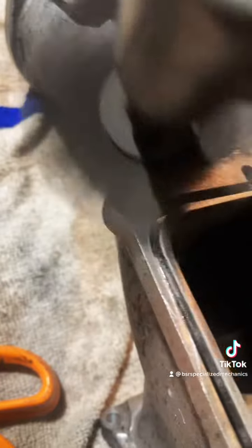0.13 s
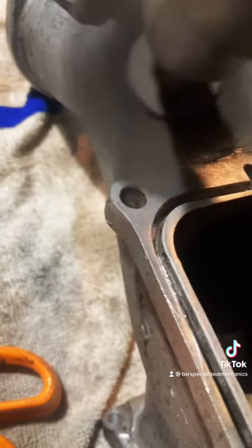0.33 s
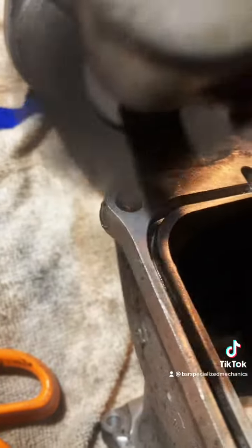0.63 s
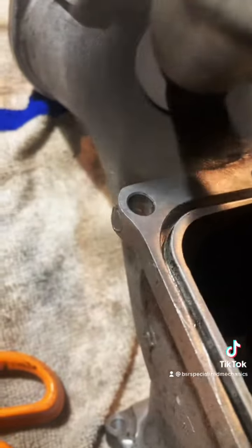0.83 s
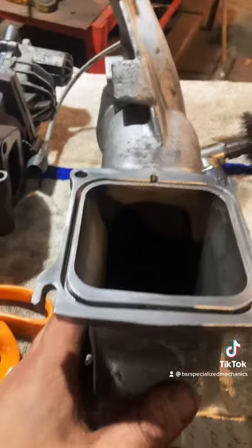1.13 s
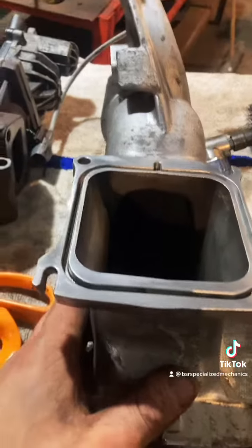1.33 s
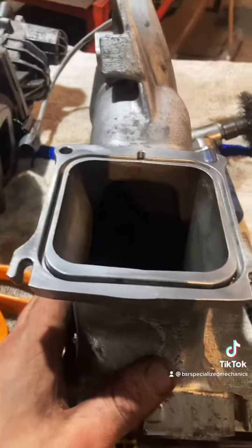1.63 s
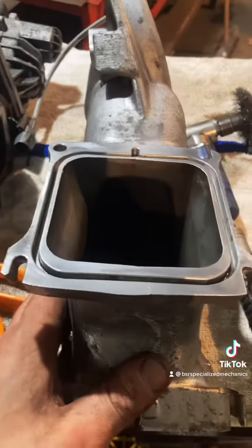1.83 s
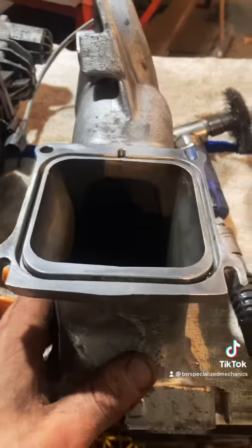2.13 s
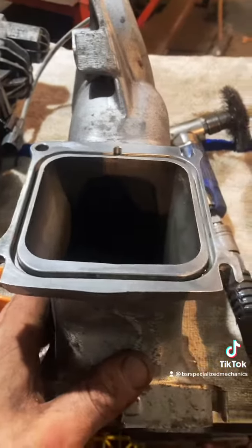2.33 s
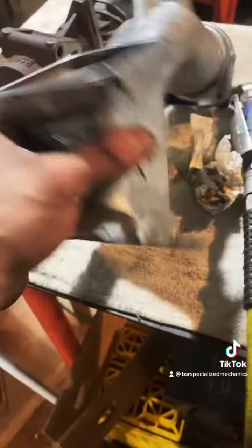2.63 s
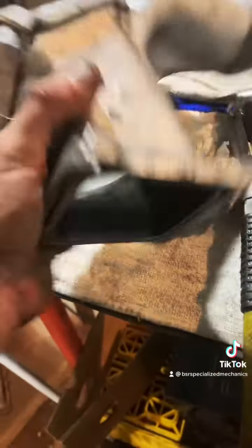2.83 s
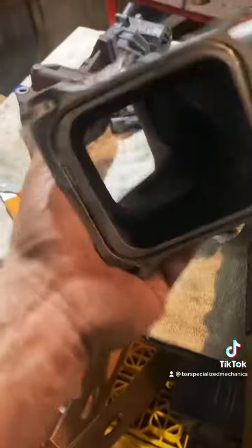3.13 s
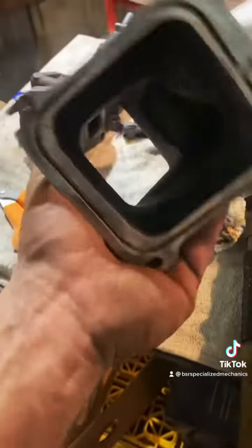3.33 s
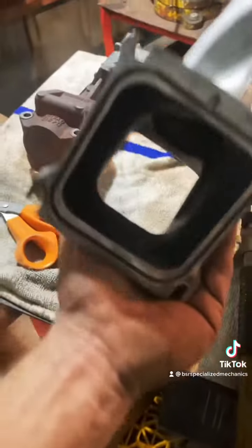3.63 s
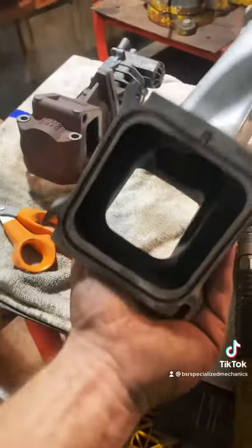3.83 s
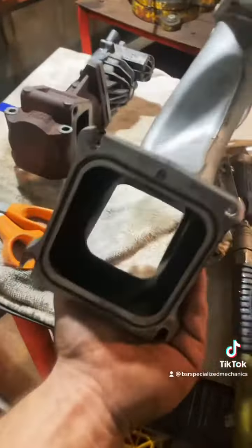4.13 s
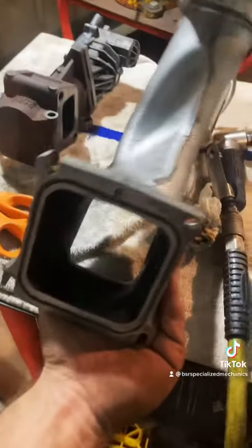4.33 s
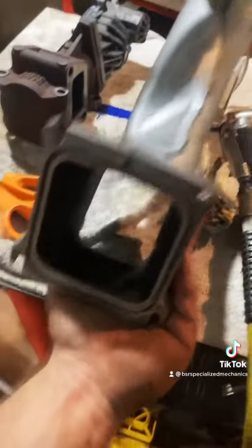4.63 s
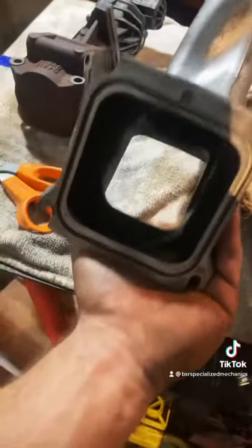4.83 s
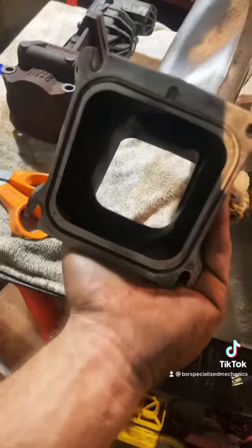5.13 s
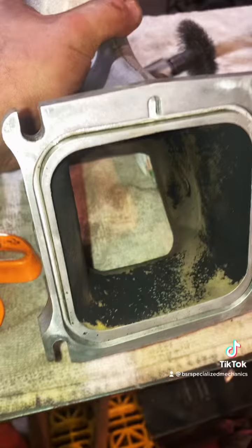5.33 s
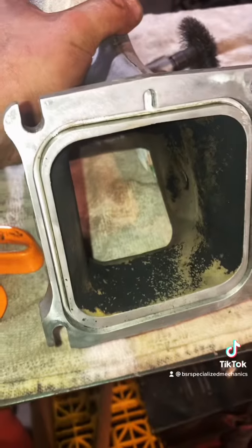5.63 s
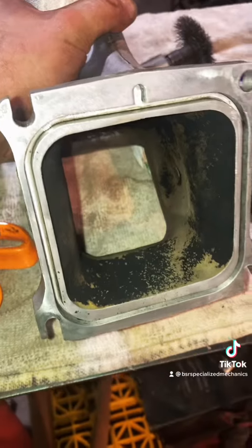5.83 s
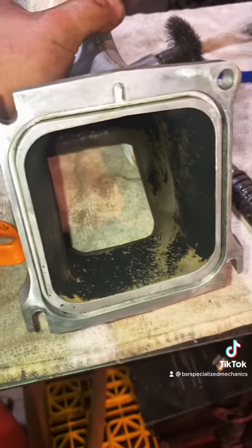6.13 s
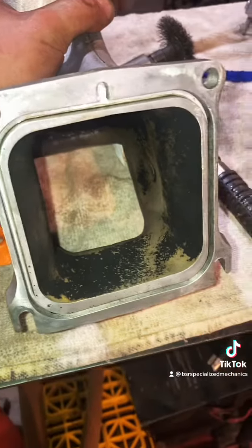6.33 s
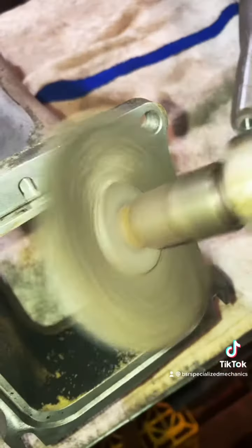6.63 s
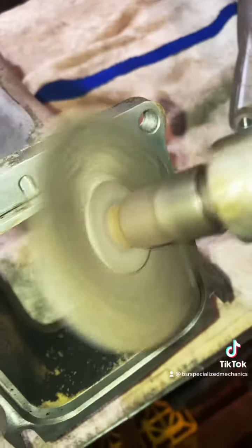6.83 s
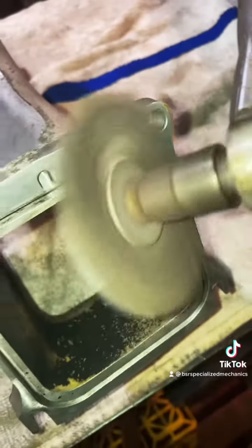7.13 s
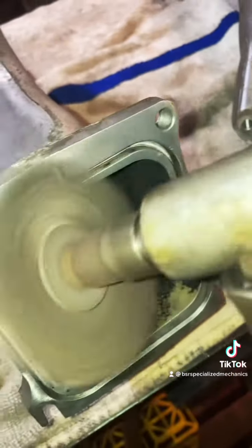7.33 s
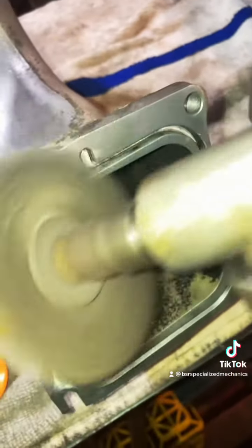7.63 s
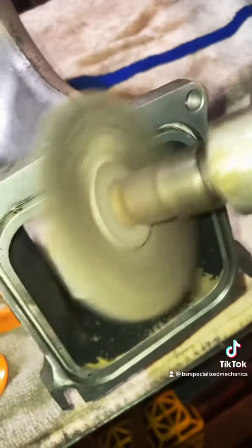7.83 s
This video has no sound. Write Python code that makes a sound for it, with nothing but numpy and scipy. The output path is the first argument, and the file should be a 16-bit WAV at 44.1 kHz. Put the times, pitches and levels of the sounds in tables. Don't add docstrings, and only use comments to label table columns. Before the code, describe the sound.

Wire wheel whine and scratchy hiss, cut to a throbbing piston machine with airy hiss and one dull knock, finally rougher, lower grinding.

```python
import sys
import numpy as np
from scipy import signal
from scipy.fft import rfft, irfft
from scipy.io import wavfile
from scipy.ndimage import uniform_filter1d

SR = 44100
rng = np.random.default_rng(int(sys.argv[2]) if len(sys.argv) > 2 else 0)


def nominal_scale(level):
    x = np.asarray(level, float) / 20
    return 10 ** x


def digitize_waveform(pressure):
    field = np.atleast_2d(pressure).T
    bounded = np.clip(field, -1, 1)
    quanta = np.round(bounded * 32767).astype(np.int16)
    wavfile.write(sys.argv[1], SR, quanta)


N = 352800
T = np.arange(N) / SR

# start t/s, end t/s, machine speed f/Hz
SPELLS = [
    (0, 1.0469, 30.384),
    (1.2086, 2.4136, 30.372),
    (2.5881, 5.2469, 30.365),
    (5.4225, 6.5802, 30.354),
    (6.7763, 8.1, 30.344),
]

# t/s, f/Hz
SHAFT = [
    [(0.0, 662), (0.11, 632.8), (0.278, 618.7), (0.464, 710.5), (0.52, 731), (0.59, 740), (0.655, 666),
     (0.906, 749.5), (1.045, 735)],
    [(6.78, 427.8), (7.0, 432.4), (7.126, 361.6), (7.292, 402.8), (7.424, 354.3), (7.608, 476.7),
     (7.7, 501.5), (7.908, 510.6), (8.0, 494)],
]
# t/s, sag f/Hz
SNAGS = [
    (6.87, 15),
    (7.8, 20),
]
SNAG_HALF_S = .1
INERTIA_S = .03
# f/Hz, level/dB
TOOL_BODY = [
    [(640, -28.5), (750, -32), (1250, -39), (1335, -33), (1430, -37), (2230, -48.5), (2550, -29.5),
     (3250, -40)],
    [(350, -21), (510, -22.5), (740, -33), (1125, -28.5), (1260, -42.5), (1920, -39.5), (2010, -30.5),
     (2500, -33)],
]
# shaft order, level/dB
UPPER_WHINE = [
    [(6, -42), (7, -44), (8, -42)],
    [(6, -33), (7, -33), (8, -34), (9, -33), (10, -34)],
]
LIFT_S, LIFT_DB, LIFT_RAMP_S = 7.38, -3, 0.063
# t/s, level/dB
PRESS = [
    [(0.0, 1), (0.14, -1), (0.58, 0.5), (0.635, 4.5), (0.7, 0), (1.045, 0.5)],
    [(6.78, 5), (6.86, 1.5), (7.01, 2), (7.12, -1), (7.25, 1.5), (7.45, 0), (7.52, 0), (7.76, 0),
     (8.0, -4.5)],
]
# f/Hz, level/dB per Hz
BRUSH_COLOUR = [
    [(530, -38.5), (900, -11.5), (1260, -31), (1470, -11), (1890, -16), (2580, 2), (3060, -4), (3660, 1),
     (4880, -5.5), (6200, -1), (8270, -6), (9320, -0.5), (11000, -8), (14500, -13.5), (15800, -22)],
    [(650, -45), (1100, -19), (1370, -38), (1490, -11.5), (1760, -19.5), (1940, -4.5), (2270, 2.5),
     (3210, 3.5), (3470, -0.5), (6480, -3), (9250, -9), (10600, -9), (12200, -17.5), (13700, -14),
     (15800, -23)],
]
HISS_DB, HISS_PER_PRESS, BRIGHT_PER_PRESS = [-24, -18.5], [.7, 1.01], [.6, -.4]
# f/Hz, width f/Hz, level/dB
PART_MODES = [
    [(3300, 40, -2), (5125, 30, -1), (5550, 30, -6), (5760, 30, -1), (6245, 30, -2), (6901, 25, 0),
     (7316, 30, -5), (7574, 30, -6), (8748, 35, 0), (9442, 50, -7), (10228, 50, -6), (14648, 40, -12)],
    [(3298, 35, 1), (3856, 33, -10), (4522, 40, -3), (5336, 25, 2), (5761, 25, 2), (6243, 25, 1),
     (6600, 35, -7), (7483, 30, -7), (8091, 25, -5), (8802, 35, -6), (11649, 30, -14)],
]
# start t/s, length t/s, spot f/Hz, level/dB, reach/octaves
TOUCHES = [
    [(0.0, 0.054, 5700, -24.5, .3), (0.0, 0.24, 6600, -31.5, .1), (0.03, .12, 3300, -34.5, .1),
     (0.06, 0.095, 9400, -30.5, 0.11), (0.2, .07, 5900, -28.5, 0.09), (0.6, .07, 7500, -28, .8),
     (0.63, .06, 3300, -27, .1), (0.68, .1, 7574, -30.5, .05)],
    [(6.79, 0.11, 5336, -30, .08), (6.78, .06, 4522, -20.5, .08), (6.78, 0.071, 3300, -42.5, .1),
     (6.8, .24, 6300, -31, .06), (6.98, 0.15, 3300, -27, .1), (7.05, .05, 5761, -29, .05),
     (7.09, .12, 6243, -34, .05), (7.25, .06, 3300, -29, .1), (7.3, .09, 8091, -32, .06),
     (7.33, .17, 5761, -28.5, .05), (7.37, .13, 3300, -26.5, .1), (7.39, .1, 5336, -33, .05),
     (7.53, .12, 3300, -29, .1), (7.6, .1, 5336, -38.5, .06), (7.69, .13, 3300, -26, .15),
     (7.69, 0.14, 5761, -31, .08)],
]
TOUCH_RISE_S, TOUCH_FALL_S, REACH_DB = .02, .04, -8
BRUSHED_DB = [-45, -40.5]
# start t/s, end t/s, f/Hz, level/dB
SINGING = [
    (0.498, .63, 1325, -39),
    (0.904, 1.064, 1334, -36.5),
    (6.806, 7.12, 1902, -32),
]

MACHINE_DB = [-37.5, -22, -22.5, -21.5, -27.5]
DUCK_DB_PER_S = -5.5
# order, level/dB
ORDERS = [(1, -30), (2, -12), (3, -12.5), (4, -10), (5, -13), (6, -18), (7, -23), (8, 0), (9, -14),
          (13, -27), (14, -8), (15, -23), (21, -15), (37, 0), (38, -9)]
# order, level/dB near the bench, turned away, over the part
PLACED = [(10, -8, -11, -10), (11, -11, -13, -15), (12, -13, -10, -20), (16, -3, -7, -6),
          (17, -14, -22, -12), (18, -8, -8, -12), (19, -20, -14, -19), (20, -8, -2, -14),
          (32, -13, -14, -17), (36, -15, -7, -19)]
PLACE = [1, 1, 2, 3, 3]
ECHOED = (9, 12, 13, 15)
EARLY = (5, 6, 7, 17, 20)
TOP_ORDER = 43
COMB_DB, COMB_DB_PER_ORDER, COMB_SCATTER_DB = -21, -0.26, 1.5
CLOSE_UP_DB = 3.0
# t/s, level/dB
HOUSING = [(0, -61), (1.04, -52), (1.22, -34.5), (1.9, -32), (2.1, -37), (2.3, -33), (2.6, -27), (3.0, -24),
           (3.25, -28), (4.3, -32), (5.24, -32.5), (5.43, -33.5), (6.3, -29.5), (6.57, -30.5), (6.79, -51),
           (8.0, -55)]
# f/Hz, level/dB
VALVES = [
    (2240, -29),
    (2460, -25.5),
    (1502, -26.5),
]
HUM_HZ, HUM_DB = 58.68, -16
SWELLS = [.451, 1.698, 2.649, 5.893, 7.109]
# f/Hz, level/dB per Hz
RUMBLE = [(46, 5.2), (76, 8.8), (106, 14.1), (167, 6.6), (225, 7.0), (319, 7.0), (410, 8.1), (531, 6.1),
          (683, 5.9), (865, 8.2), (1048, 7.6), (1139, 14.6), (1260, 8.2), (1412, 2.7)]
RUMBLE_DB = [-4, -12, -9.5, -12.5, -9]

# f/Hz, level/dB per Hz
LEAK_COLOUR = [
    [(880, -27), (1500, -4.5), (1770, -5), (2310, -4.5), (2380, -4), (2680, -4.5), (2930, -3), (6080, -5.5),
     (9280, -8), (10000, -1), (12500, -18.5), (14900, -19.5), (15800, -35.5)],
    [(880, -31.5), (1500, -5.5), (2740, -8.5), (3330, -7.5), (3710, -9.5), (4390, -5.5), (5240, -10.5),
     (6710, -8), (8250, -15.5), (10400, -8.5), (12100, -24.5), (13900, -22), (15800, -33)],
    [(880, -46), (1500, -4.5), (1920, -8.5), (2500, -5), (3330, -7.5), (3640, -7.5), (4390, -4.5),
     (5450, -10), (7400, -6), (8330, -13), (10700, -10.5), (14700, -31), (15800, -27.5)],
]
LEAK_DB = [-27, -27.5, -26.5]
# t/s, level/dB, f/Hz, time to fall 60 dB t/s
BUMPS = [
    (3.82, -18, 115, .35),
]
# t/s, f/Hz, level/dB
SPLITS = [(.229, 9300, -32), (.414, 7600, -36), (.943, 10400, -31), (.943, 14800, -38), (4.49, 9700, -44),
          (4.854, 9000, -40), (5.228, 7200, -43), (6.351, 4700, -44), (6.39, 8200, -38),
          (6.989, 12500, -41), (7.992, 4700, -31)]


def evened(x):
    return x / np.sqrt(np.mean(x ** 2) + 1e-20)


def curve(rows):
    times, values = np.transpose(rows)
    return np.interp(T, times, values)


def during(spell):
    return (T >= SPELLS[spell][0]) & (T < SPELLS[spell][1])


def wander(hz):
    knots = rng.standard_normal(400)
    return np.interp(T * hz, np.arange(400), knots) * 1.22


def band(order, edges_hz, kind, x):
    return signal.sosfilt(signal.butter(order, edges_hz, kind, fs=SR, output="sos"), x)


def noise(colour, patchy_db, streaky_db):
    hz = np.fft.rfftfreq(1024, 1 / SR)
    real, imag, patches, streaks = rng.standard_normal((N // 256 + 5, 513, 4)).T
    patches = uniform_filter1d(patches, size=8, axis=0)
    patches = evened(uniform_filter1d(patches, size=12, axis=1))
    streaks = evened(uniform_filter1d(streaks, size=50, axis=1))
    f, db = np.transpose(colour)
    shape = nominal_scale(np.interp(np.log(hz + 1), np.log(f), db, left=-99, right=-99))[:, None]
    z = (real + 1j * imag) * shape * nominal_scale(patchy_db * patches + streaky_db * streaks)
    return evened(signal.istft(z, nperseg=1024, noverlap=768)[1][:N])


def resonate(x, hz, width):
    r = np.exp(-np.pi * width / SR)
    return evened(signal.lfilter([1, 0, -1], [1, -2 * r * np.cos(2 * np.pi * hz / SR), r * r], x))


def grinder(k):
    sag = sum(sag_hz * np.clip(1 - abs(T - s) / SNAG_HALF_S, 0, 1) for s, sag_hz in SNAGS)
    hz = uniform_filter1d(curve(SHAFT[k]) - sag, size=round(INERTIA_S * SR))
    turn = 2 * np.pi * np.cumsum(hz * (1 + .0015 * wander(40))) / SR
    press_db = curve(PRESS[k])
    whine = shaft_whine(k, hz, turn)
    return during(4 * k) * (whine + wire_hiss(k, turn, press_db) + ringing_part(k, press_db))


def shaft_whine(k, hz, turn):
    body_hz, body_db = np.transpose(TOOL_BODY[k])
    lift_db = LIFT_DB * np.clip((T - LIFT_S) / LIFT_RAMP_S, 0, 1)
    whine = np.zeros(N)
    for n in range(1, 6):
        db = np.interp(np.log(n * hz), np.log(body_hz), body_db)
        whine += nominal_scale(db + lift_db * (n == 1) + 1.2 * wander(30)) * np.cos(n * turn + n)
    for n, db in UPPER_WHINE[k]:
        whine += nominal_scale(db + 1.2 * wander(6.7)) * np.cos(round(n) * turn + n)
    return np.sqrt(2) * whine


def wire_hiss(k, turn, press_db):
    hiss = noise(BRUSH_COLOUR[k], 1.2, 3.3) * (1 + 0.14 * np.cos(turn)) * nominal_scale(0.58 * wander(45))
    treble = signal.sosfiltfilt(signal.butter(2, 4500, "high", fs=SR, output="sos"), hiss)
    hiss += treble * (nominal_scale(BRIGHT_PER_PRESS[k] * press_db) - 1)
    return nominal_scale(HISS_DB[k] + HISS_PER_PRESS[k] * press_db + 1.0) * hiss


def ringing_part(k, press_db):
    ring = np.zeros(N)
    modes_hz = np.transpose(PART_MODES[k])[0]
    rung = np.sqrt(sum(touch(*row, modes_hz) ** 2 for row in TOUCHES[k]))
    for (f, width, db), level in zip(PART_MODES[k], rung):
        pressed = np.hypot(np.interp(T, T[::64], level), nominal_scale(BRUSHED_DB[k] + press_db))
        cycles = np.cumsum(f + .15 * width * wander(60)) / SR
        ring += pressed * nominal_scale(db + 1.8 * wander(20)) * np.sqrt(2) * np.cos(2 * np.pi * cycles)
    return ring


def touch(start, length, spot_hz, db, reach, modes_hz):
    t = T[::64]
    rise = (t - start) / TOUCH_RISE_S + .5
    fall = (start + length - t) / TOUCH_FALL_S + .5
    shape = np.clip(np.minimum(rise, fall), 0, 1)
    return shape * nominal_scale(db + REACH_DB * (np.log2(modes_hz / spot_hz) / reach) ** 2)[:, None]


def singing():
    out = np.zeros(N)
    for start, end, hz, db in SINGING:
        swell = np.clip(np.minimum(T - start, end - T) / 0.037, 0, 1)
        cycles = np.cumsum(hz + 11.0 * wander(20)) / SR
        out += nominal_scale(db + 1.7 * wander(28)) * swell * np.cos(2 * np.pi * cycles)
    return np.sqrt(2) * out


def shake():
    low = band(2, [40, 105], "band", rng.standard_normal(N))
    return nominal_scale(-44.5 + 3 * wander(8)) * evened(low) * during(4)


def machine():
    out, scatter, rumble = np.zeros(N), rng.standard_normal(64), machine_rumble()
    comb = {k: COMB_DB + COMB_DB_PER_ORDER * (k - 22) + COMB_SCATTER_DB * scatter[-k]
            for k in range(22, TOP_ORDER + 1)}
    for spell, (start, _, turn_hz) in enumerate(SPELLS):
        on = during(spell)
        placed = {row[0]: row[PLACE[spell]] for row in PLACED}
        orders = {**comb, **dict(ORDERS), **placed}
        main_db = MACHINE_DB[spell] + DUCK_DB_PER_S * (spell == 4) * (T[on] - start)
        whine_db = curve(HOUSING)[on]
        turn = 2 * np.pi * turn_hz * T[on]
        for k, db in orders.items():
            if spell == 0:
                db += CLOSE_UP_DB * ((2 < k < 12 and k != 8) - (k == 16))
            housing = 36 <= k <= 38
            spread = 0 if k == 2 else .35 if k <= 20 or housing else 3
            lag = np.pi * ((k in ECHOED) - .35 * (k in EARLY) + .5 * k * housing) + spread * scatter[k]
            level_db = (whine_db if housing else main_db) + db + 0.03 * k * wander(5)[on]
            out[on] += nominal_scale(level_db) * np.cos(k * turn - lag)
        for hz, db in VALVES:
            out[on] += nominal_scale(main_db + db) * np.cos(2 * np.pi * hz * T[on])
        beat = 2 * np.pi * (2 * turn_hz - HUM_HZ) * (T[on] - SWELLS[spell])
        out[on] += nominal_scale(main_db + HUM_DB) * np.cos(2 * turn - beat)
        out[on] += nominal_scale(main_db + RUMBLE_DB[spell]) * rumble[on]
    return np.sqrt(2) * out


def machine_rumble():
    f, db = np.transpose(RUMBLE)
    hz = np.fft.rfftfreq(N, 1 / SR)
    shape = nominal_scale(np.interp(hz, [20, *f, 1700], [-15, *db, -20])) * (hz < 1700)
    return evened(irfft(rfft(rng.standard_normal(N)) * shape, N))


def air():
    level = sum(during(i + 1) * nominal_scale(db - 2.93) for i, db in enumerate(LEAK_DB))
    hiss = sum(during(i + 1) * noise(colour, 0.29, 3.0) for i, colour in enumerate(LEAK_COLOUR))
    whistle = resonate(rng.standard_normal(N), 3360, 28)
    hiss += nominal_scale(np.interp(T, [2.6, 3.6, 6.6], [-27, -12.5, -17])) * whistle
    return level * hiss * (1 + 0.048 * np.cos(2 * np.pi * SPELLS[2][2] * T))


def bumps():
    out = np.zeros(N)
    for s, db, hz, t60 in BUMPS:
        t = np.maximum(T - s, 0)
        out += nominal_scale(db - 60 * t / t60) * np.sin(2 * np.pi * hz * t) * (1 - np.exp(-t / 0.005))
    return out


def smears():
    level = np.zeros(N)
    for _, end, _ in SPELLS[:4]:
        level += (T >= end) * nominal_scale(-50 - 700. * np.maximum(T - end, 0)) * (T < end + .03)
    return level * evened(band(5, 1000, "low", rng.standard_normal(N)))


def splits():
    side = np.zeros(N)
    for s, hz, db in SPLITS:
        burst = evened(band(4, [hz - 900, hz + 900], "band", rng.standard_normal(1600)))
        part = side[round(s * SR) - 800:][:1600]
        part += nominal_scale(db) * (burst * np.hanning(1600))[:len(part)]
    return side


def scene():
    mono = grinder(0) + grinder(1) + singing() + shake() + machine() + air() + bumps()
    return np.array([mono, mono])


def low_pass(x):
    return signal.sosfilt(signal.butter(12, 16080, fs=SR, output="sos"), x)


def record(dry):
    on = sum(during(spell) for spell in range(5))
    side = splits()
    mix = np.tanh(dry / 2) * 2 * on + smears() + np.array([side, -side])
    treble_limit = signal.firwin(255, 15800, window=("kaiser", 9), fs=SR)
    mix = signal.oaconvolve(mix, treble_limit[None], "same")
    return low_pass(mix)


dry = scene()
out = record(dry)
digitize_waveform(out)
```